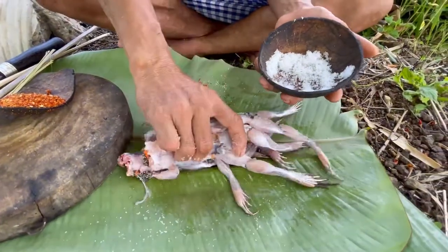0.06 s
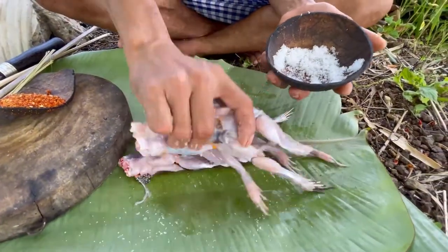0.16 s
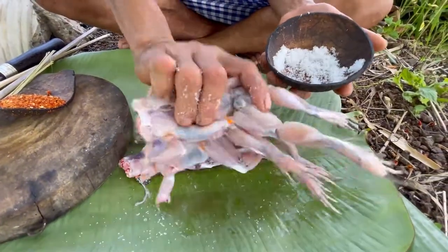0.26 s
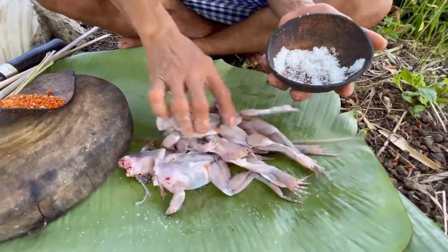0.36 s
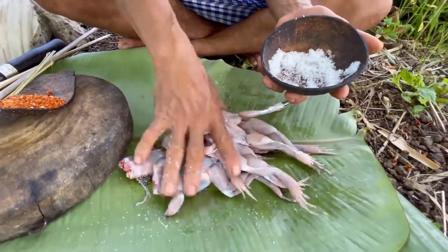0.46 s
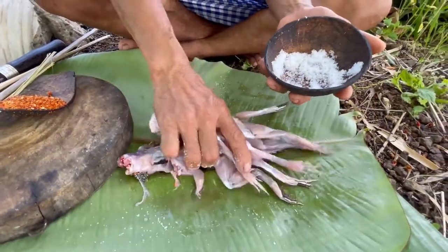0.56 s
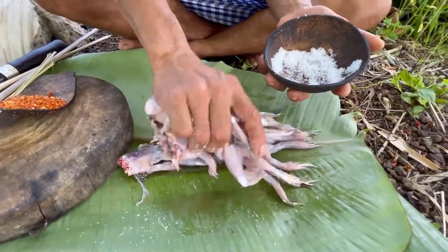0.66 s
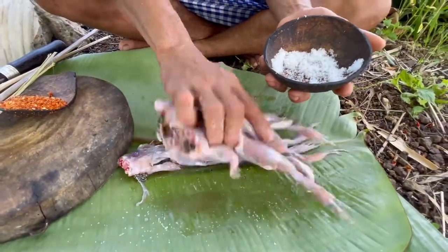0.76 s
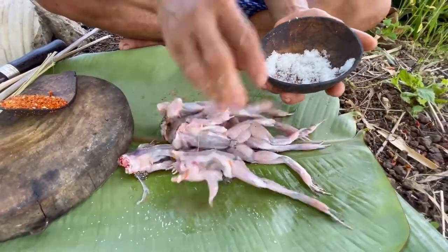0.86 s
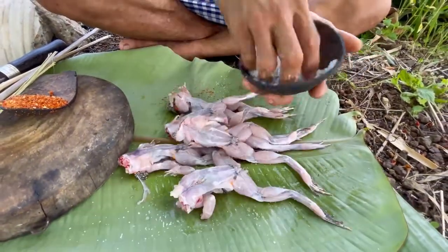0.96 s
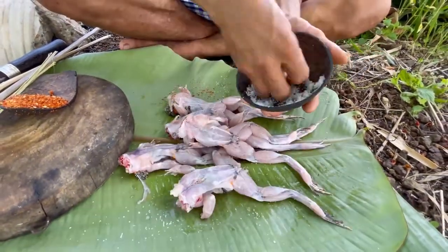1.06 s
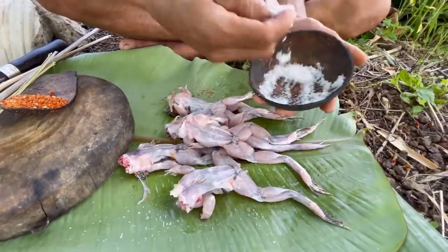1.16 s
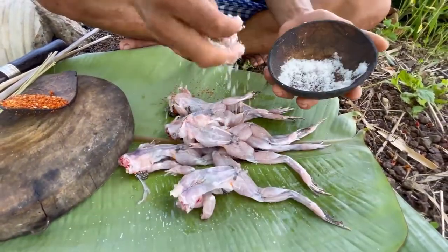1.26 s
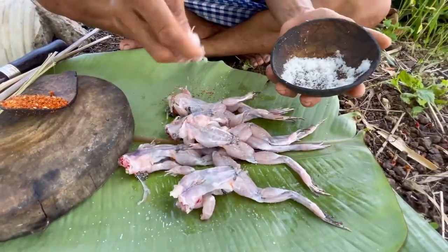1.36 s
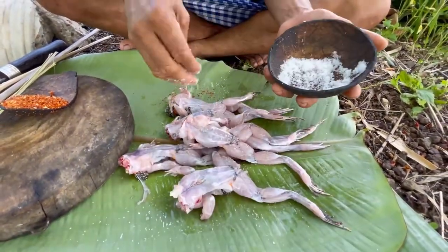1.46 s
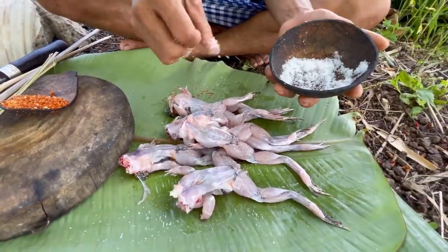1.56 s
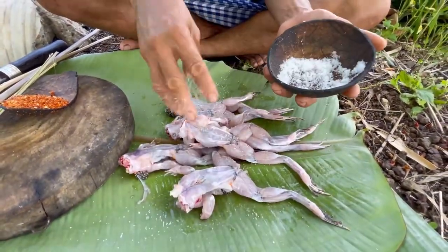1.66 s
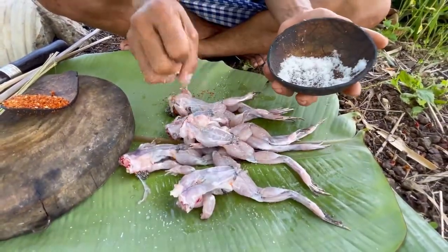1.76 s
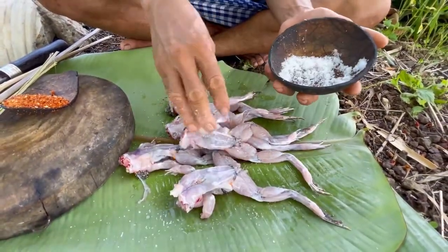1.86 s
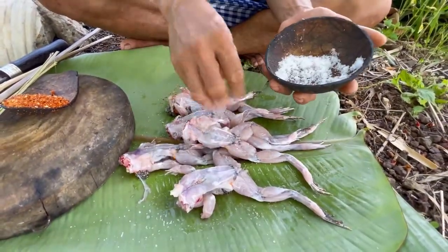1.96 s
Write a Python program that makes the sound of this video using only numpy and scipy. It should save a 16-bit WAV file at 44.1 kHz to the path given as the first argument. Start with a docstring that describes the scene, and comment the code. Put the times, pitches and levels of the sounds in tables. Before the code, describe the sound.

Wet meat on a big leaf, heard close: faint sticky crackle and crisp ticks until 0.2 s, a loud, hard slap at 0.35 s, soft dragging rustle from 0.5 to 0.7 s, a weaker slap at 0.83 s. Fingers crunch through coarse salt in a bowl at 1.0-1.15 s. Sparse bright salt ticks and short patters follow from 1.3 to 2 s. Quiet outdoor rumble and airy hiss.

```python
"""Outdoors, a phone's stereo microphone close to a big leaf, a far low rumble, faint hum and air hiss behind.
A hand drags raw meat over the leaf, lifts it and slaps it down twice: coloured noise grains, and ringing knocks.
It scoops coarse salt from a shell bowl, crunching and gritty, as three differently coloured streams of grains.
The salt is sprinkled in short showers of grains; single crystals tick as short ringing bursts."""
import sys
import numpy as np
from scipy import signal
from scipy.fft import rfft, irfft
from scipy.io import wavfile
from scipy.ndimage import uniform_filter1d, map_coordinates

SR = 44100
rng = np.random.default_rng(int(sys.argv[2]) if len(sys.argv) > 2 else 0)


def inscribe(sig):
    """Save sig as 16-bit PCM at rate SR to the path in sys.argv[1].

    A 1-D sig is mono; a 2-D sig holds one channel per row.
    Samples are clipped to [-1, 1] before scaling.
    """
    pcm = np.round(np.clip(np.atleast_2d(sig).T, -1, 1) * 32767)
    wavfile.write(sys.argv[1], SR, pcm.astype(np.int16))


def field_ratio(decibels):
    """Amplitude ratio for a level in dB (20 dB per decade); scalars and array-likes work."""
    return 10 ** (np.asarray(decibels, dtype=float) / 20)


N = 88200  # two seconds


def column(table, axis):
    """Gain per sample, interpolated in dB from one column of a table whose first column is time."""
    rows = np.array(table)
    level_db = np.interp(np.arange(N) / SR, rows[:, 0], rows[:, axis], left=-120, right=-120)
    return field_ratio(level_db)


def colour(x, points):
    """Causal minimum-phase filter with the given spectrum, scaled to power gain 1 for white noise."""
    rows = np.array(points)
    hz = np.maximum(np.arange(1025) * SR / 2048, 1)
    spectrum_db = np.interp(np.log(hz), np.log(rows[:, 0]), rows[:, 1])
    cepstrum = irfft(np.log(field_ratio(np.maximum(spectrum_db, -70))))
    # folding the cepstrum onto positive time makes the filter causal
    cepstrum[1:1024] *= 2
    cepstrum[1025:] = 0
    taps = irfft(np.exp(rfft(cepstrum)))
    taps = taps / np.sqrt(np.sum(taps ** 2))
    return signal.fftconvolve(x, taps[None], axes=1)[:, :N]


def pair(alike):
    """Left and right white noise with correlation alike (0 to 1)."""
    a, b = rng.standard_normal((2, N))
    return np.array([a, alike * a + np.sqrt(1 - alike ** 2) * b])


def grains(per_s, spread_db, decay_s, alike):
    """Tiny noise bursts at random times and of uneven size, each dying away exponentially; rms 1."""
    chance, size = rng.random((2, N))
    hits = (chance < per_s / SR) * field_ratio(-spread_db * np.log(size + 1e-3)) ** 2
    fall = np.exp(-2 / (decay_s * SR))  # power falls twice as fast as amplitude
    power = signal.lfilter([1], [1, -fall], hits)
    return pair(alike) * np.sqrt(power / np.mean(power))


def place(x, pan_db, lead):
    """Stereo position: the left is louder by pan_db and leads by some samples."""
    at = np.arange(N)
    left = map_coordinates(x[0], [at + lead / 2], mode="nearest") * field_ratio(pan_db / 2)
    right = map_coordinates(x[1], [at - lead / 2], mode="nearest") * field_ratio(-pan_db / 2)
    return np.array([left, right])


# spectrum of the far rumble: (frequency [Hz], relative level [dB per Hz])
RUMBLE = [(30, -48), (80, -13.5), (96, -2.5), (211, -2), (314, -7.5), (397, -12), (583, -21.5),
          (669, -32.5), (800, -53), (1100, -73)]
# spectrum of the air hiss: (frequency [Hz], relative level [dB per Hz])
AIR = [(410, -62), (700, -14), (1600, -11), (2280, -3.5), (3600, -7), (12000, -4.5), (15500, -1.5)]


def outdoors():
    """Far low rumble and a narrow-band noise hum, nearly alike on both sides; wide air hiss that wavers."""
    hum_hz, hum_width_hz = 315.2, 3.4
    rumble_db, hum_db, air_db = -50.5, -59, -57.5
    rumble = colour(pair(0.85), RUMBLE) * field_ratio(rumble_db)
    hum = signal.lfilter(*signal.iirpeak(hum_hz, hum_hz / hum_width_hz, fs=SR), pair(0.91))
    hum = hum / hum.std() * field_ratio(hum_db)
    waver = uniform_filter1d(rng.standard_normal(N), SR // 20)
    waver_db = waver / waver.std()
    air = colour(pair(0.033), AIR) * field_ratio(air_db + waver_db)
    return rumble + hum + air


# meat close by on the leaf, lift, slap, drag, slap:
# (time [s], leaf body level [dB], wet crackle gain [dB])
MEAT = [(0, -50, -55), (.07, -52, -48), (.095, -53, -45.5), (.115, -59, -55), (.25, -54, -59),
        (.275, -76, -60), (.338, -49.5, -55), (.342, -32.5, -38), (.356, -28.5, -35), (.365, -34.5, -34),
        (.375, -45, -34), (.379, -38, -43), (.388, -38.5, -38.5), (.405, -55, -53), (.42, -47, -53),
        (.47, -71, -65.5), (.5, -53.5, -56.5), (.512, -50, -48), (.56, -49, -49), (.64, -52.5, -47),
        (.7, -58, -56.5), (.765, -70.5, -62.5), (.79, -66.5, -49.5), (.815, -50, -55), (.826, -43, -43.5),
        (.84, -38.5, -33.5), (.857, -45, -44.5), (.868, -48.5, -53), (.92, -59, -63.5), (.975, -56.5, -62)]
# spectrum of the leaf's dull body: (frequency [Hz], relative level [dB per Hz])
LEAF = [(150, -43), (240, -4.5), (420, -6), (574, -13), (936, -9), (1480, -4), (2020, -3), (2460, -11),
        (3000, -12), (4300, -62.5)]
# tilt of the wet crackle: (frequency [Hz], relative level [dB per Hz])
CRACKLE = [(2300, -22), (2700, -3), (3900, -5), (4600, -4), (8200, -8.5), (13500, -6.5), (16000, -15)]
# edges between the pitch ranges of the pops: (frequency [Hz])
CRACKLE_EDGES = [1500, 3200, 5000, 7500, 10500, 17000]


def meat():
    """Wet flesh sticks and slips on the leaf: dull body, and crackle with separate pops per pitch range."""
    body = colour(grains(1500, 2.36, 0.002, 0.67) * column(MEAT, axis=1), LEAF)
    pops = np.zeros((2, N))
    for edges in zip(CRACKLE_EDGES, CRACKLE_EDGES[1:]):
        band = signal.butter(2, edges, "band", fs=SR, output="sos")
        pops += signal.sosfilt(band, grains(1900, 2.2, 0.0027, 0.17))
    crackle = colour(pops * column(MEAT, axis=2), CRACKLE)
    return place(body, 3.1, 4.07) + place(crackle, 2.4, 2.1)


# single crystals snapping or landing close by:
# (time [s], snap level [dB], ring frequency [Hz], leaf gain [dB])
TICKS = [(0.084, -29, 6930, -51), (0.0962, -27.5, 7140, -49), (0.1317, -19.5, 13800, -39),
         (0.157, -25.5, 6450, -37.5), (0.2006, -35, 11900, -40), (0.476, -33, 12620, -69),
         (0.6772, -25.5, 11120, -58), (1.0126, -22.5, 11900, -47), (1.3212, -28.5, 7650, -42),
         (1.34, -38, 13100, -60), (1.373, -31.5, 12000, -42), (1.475, -33, 8100, -44.5),
         (1.516, -41, 12600, -49), (1.5324, -38.5, 4670, -42.5), (1.6838, -33, 11500, -43),
         (1.7133, -42, 12300, -45.5), (1.73, -37, 8270, -49), (1.7415, -35, 11500, -42.5),
         (1.7677, -30, 12370, -47.5), (1.843, -34.5, 14200, -70), (1.8807, -32.5, 6700, -36.5),
         (1.89, -35, 4250, -59), (1.894, -27, 14000, -56), (1.8962, -28.5, 4040, -46),
         (1.912, -42, 12000, -50), (1.9479, -31.5, 11950, -38.5)]


def ticks():
    """A short burst per crystal, ringing at its own pitch over a broad snap; the leaf answers lower."""
    decay_s, rise_s, broad_db = 0.0013, 0.0004, -6
    snaps, leaf = np.zeros((2, N)), np.zeros((2, N))
    t = np.arange(500) / SR
    shape = np.exp(-t / decay_s) * (1 - np.exp(-t / rise_s))
    for start_s, db, hz, leaf_db in TICKS:
        a, b = rng.standard_normal((2, len(t))) * shape
        burst = np.array([a, 0.093 * a + 0.93 * b])
        ring = signal.lfilter(*signal.iirpeak(hz, 4.5, fs=SR), burst)
        tick = ring / ring.std() + field_ratio(broad_db) * burst / burst.std()
        # the falling salt lands nearer the middle
        pan_db = 4.7 if start_s < SHOWERS[0][0] else 0.8
        lean = field_ratio(np.array([[1], [-1]]) * pan_db / 2)
        i = int(start_s * SR)
        snaps[:, i:i + len(t)] += lean * field_ratio(db) * tick / np.abs(tick).max()
        leaf[:, i:i + len(t)] += field_ratio(leaf_db) * a
    snaps = signal.sosfilt(signal.butter(2, 2800, "high", fs=SR, output="sos"), snaps)
    return place(snaps, 0, 2.5) + place(colour(leaf, LEAF), 4.3, 5.3)


# knocks of the leaf, mostly as the meat slaps it, close by:
# (time [s], level [dB], frequency the struck spot favours [Hz])
KNOCKS = [(0.3411, -25, 900), (0.348, -24.5, 1020), (0.3521, -6.5, 1900), (0.3679, -21.5, 1620),
          (0.372, -23, 1150), (0.508, -33, 1510), (0.8235, -30, 1360), (0.827, -29, 2050),
          (0.8285, -27.5, 790), (0.8385, -22.5, 3900), (0.839, -23, 1290), (0.889, -48, 1700),
          (0.898, -37, 1580), (0.908, -36.5, 2040), (0.98, -30.5, 1840), (1.8937, -38, 1490)]
# short modes of the leaf: (typical frequency [Hz], typical level [dB], time to fall 60 dB [s])
KNOCK_MODES = [(230.7, -9.5, 0.016), (400, -7.5, 0.016), (816, -1.5, 0.011), (1038, -1, 0.018),
               (1411, -1, 0.016), (1910, -7.5, 0.008), (2003, -3, 0.013), (3863, 6, 0.0077)]


def knocks():
    """Each knock rings the leaf's short modes, most those near the pitch its spot favours."""
    spread_oct, far_db, swell_s = 0.38, -11.5, 0.0007
    out, t = np.zeros((2, N)), np.arange(1200) / SR
    swell = 1 - np.exp(-(t / swell_s) ** 2)
    for start_s, db, spot_hz in KNOCKS:
        ring = np.zeros(len(t))
        for hz, mode_db, t60 in KNOCK_MODES:
            level_chance, pitch_chance = rng.standard_normal(2)
            octaves = np.log2(hz / spot_hz)
            favour_db = max(-6 * (octaves / spread_oct) ** 2, far_db)
            gain = field_ratio(mode_db + 1.8 * level_chance + favour_db)
            wave = np.sin(2 * np.pi * hz * (1 + 0.0033 * pitch_chance) * t)
            ring += gain * wave * 1000. ** (-t / t60)
        ring *= swell
        i = int(start_s * SR)
        out[:, i:i + len(t)] += field_ratio(db) * ring / np.abs(ring).max()
    # a leaf radiates no deep bass
    out = signal.sosfilt(signal.butter(2, 160, "high", fs=SR, output="sos"), out)
    return place(out, 4.5, 4.64)


# fingers digging in the salt bowl, then from 1.15 s a faint first shower of salt, close by:
# (time [s], crunch level [dB], fine grit level [dB], bowl level [dB])
SCOOP = [(.978, -53, -60.5, -53), (.982, -48, -47, -43), (.995, -66, -64, -57), (.999, -48, -37.5, -44),
         (1.014, -64, -46, -53), (1.02, -68, -56, -57), (1.031, -44.5, -40.5, -50.5),
         (1.058, -40, -38.5, -49.5), (1.085, -44, -45.5, -57), (1.102, -37.5, -42, -60),
         (1.112, -35, -43, -54.5), (1.126, -39.5, -44, -60), (1.142, -53, -45, -62.5),
         (1.15, -80, -67, -83), (1.2, -61, -55.5, -98), (1.235, -63, -54.5, -89), (1.26, -87.5, -75, -87)]
# spectra of the crunch, grit and bowl: (frequency [Hz], relative level [dB per Hz])
CRUNCH = [(3530, -54.5), (6000, -13.5), (6690, -0.5), (9640, -0.5), (10500, -22.5), (11000, -8.5),
          (14300, -44)]
GRIT = [(8000, -36.5), (10500, -3), (12000, -1), (14000, -6.5), (16000, -9.5)]
BOWL = [(410, -28.5), (750, -6), (1150, -14), (1450, -6), (1630, -18), (2300, -13.5), (2620, -1),
        (2950, -15), (3500, -9.5), (4000, -17), (4500, -13.5), (5600, -19.5), (7280, -57.5)]


def scoop():
    """Crystals grind as crunch and fine grit and sound the shell bowl; a faint first shower follows."""
    crunch = colour(grains(1520, 2.11, 0.002, 0.27) * column(SCOOP, axis=1), CRUNCH)
    grit = colour(grains(6000, 1.7, 0.00082, 0.25) * column(SCOOP, axis=2), GRIT)
    bowl = colour(grains(1100, 1.8, 0.00302, 0.69) * column(SCOOP, axis=3), BOWL)
    return place(crunch + grit + bowl, 2.2, 0.31)


# later showers of salt on the leaf, close by:
# (time [s], length before the fade [s], patter level [dB], leaf body level [dB])
SHOWERS = [(1.326, 0.11, -55.5, -61), (1.467, 0.0083, -57, -66), (1.528, 0.012, -47, -51.5),
           (1.669, 0.02, -54.5, -61.5), (1.712, 0.067, -50, -59), (1.844, 0.022, -53.5, -64),
           (1.865, 0.03, -51.5, -53.5), (1.9, 0.081, -56, -64.5)]


def shower_gain(axis):
    """Gain of these showers from one level column: quick rise, hold, short fade."""
    attack_s, release_s = 0.0096, 0.018
    t, gain = np.arange(N) / SR, np.zeros(N)
    for row in SHOWERS:
        since = t - row[0]
        rise = np.clip(since / attack_s, 0, 1)
        fade = np.exp(-np.maximum(since - row[1], 0) / release_s)
        gain += field_ratio(row[axis]) * rise * fade
    return gain


# spectrum of the salt's patter: (frequency [Hz], relative level [dB per Hz])
PATTER = [(1530, -43.5), (2200, -15), (4200, -3), (6000, -6), (10100, -5), (14100, -1.5), (15500, -15)]


def sprinkle():
    """Salt rains on the leaf: many small impacts make bright patter and drum on its duller body."""
    patter = colour(grains(800, 2.1, 0.0019, 0.11) * shower_gain(axis=2), PATTER)
    drum = colour(grains(500, 2.1, 0.002, 0.18) * shower_gain(axis=3), LEAF)
    return place(patter, 2.6, 3.1) + place(drum, 3.0, 5.4)


def scene():
    """All sources together at the microphone."""
    return outdoors() + meat() + ticks() + knocks() + scoop() + sprinkle()


def band_limit(x):
    """A steep low-pass at the top of the band."""
    return signal.sosfilt(signal.butter(12, 16810, fs=SR, output="sos"), x)


def record(dry):
    """The phone cuts the deepest bass gently and the top steeply."""
    low_hz, top_hz = 40, 15700
    mix = signal.sosfilt(signal.butter(2, low_hz, "high", fs=SR, output="sos"), dry)
    mix = signal.sosfilt(signal.ellip(8, 0.2, 40, top_hz, fs=SR, output="sos"), mix)
    return band_limit(mix)


dry = scene()
out = record(dry)
inscribe(out)
```